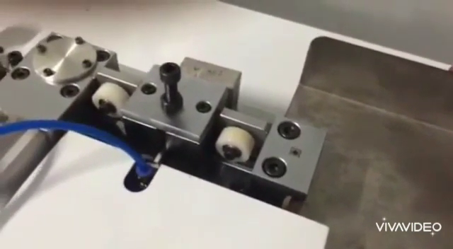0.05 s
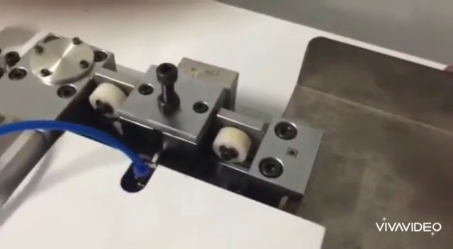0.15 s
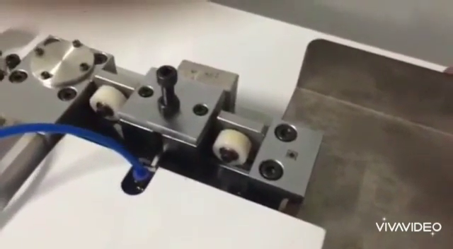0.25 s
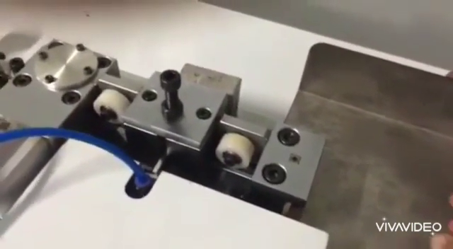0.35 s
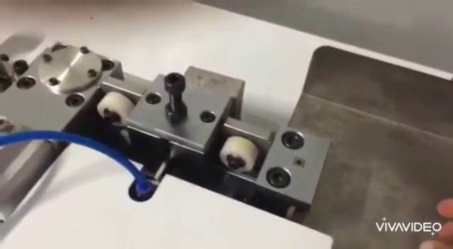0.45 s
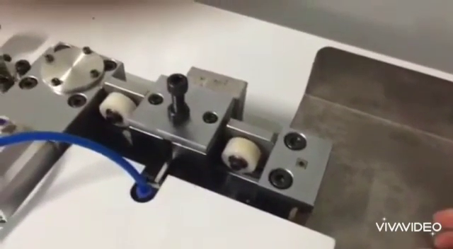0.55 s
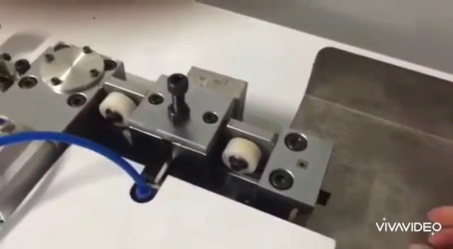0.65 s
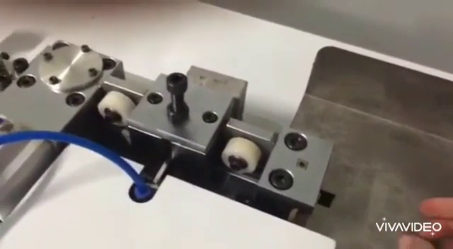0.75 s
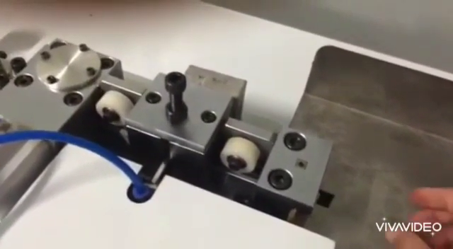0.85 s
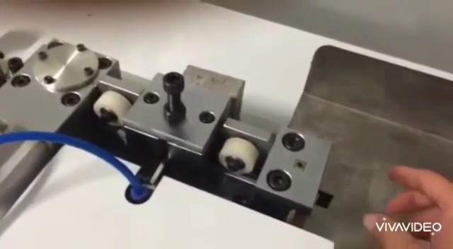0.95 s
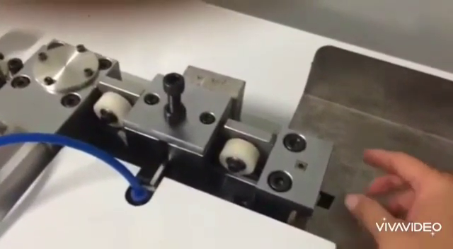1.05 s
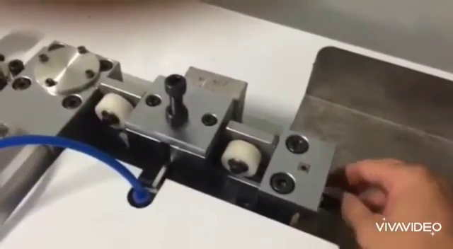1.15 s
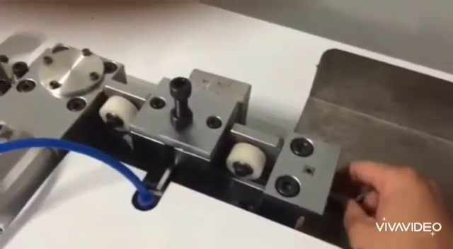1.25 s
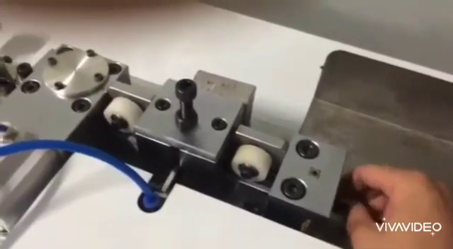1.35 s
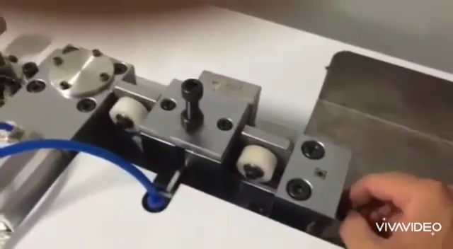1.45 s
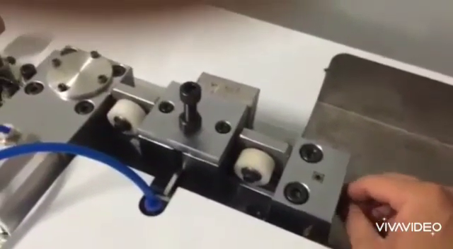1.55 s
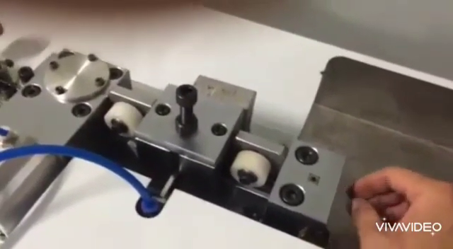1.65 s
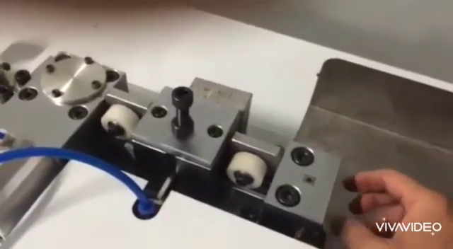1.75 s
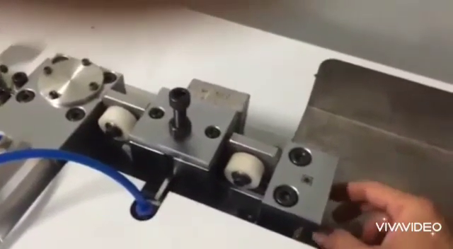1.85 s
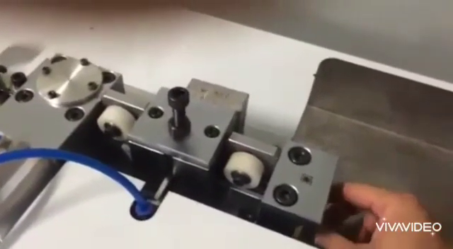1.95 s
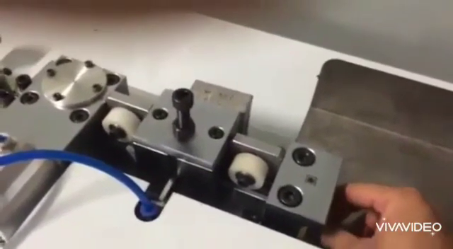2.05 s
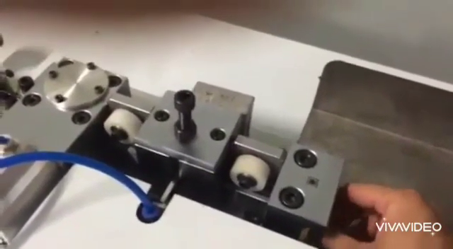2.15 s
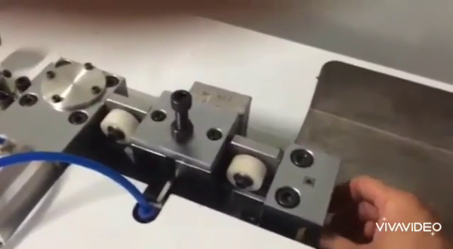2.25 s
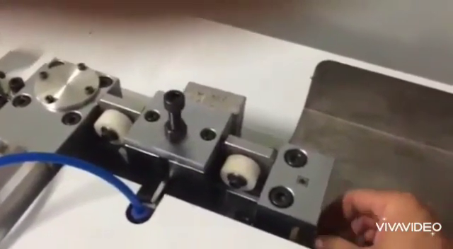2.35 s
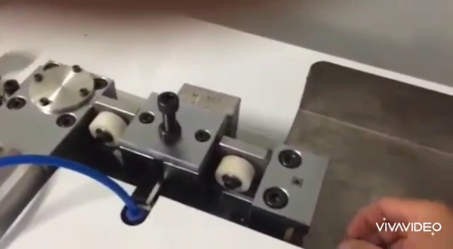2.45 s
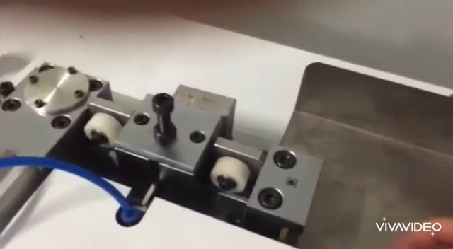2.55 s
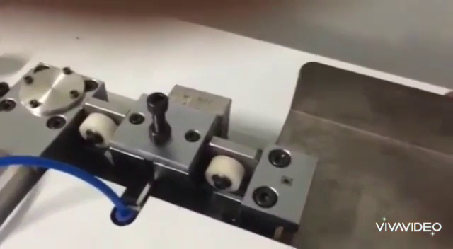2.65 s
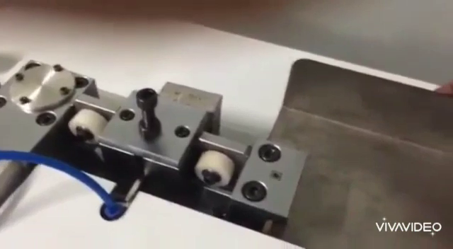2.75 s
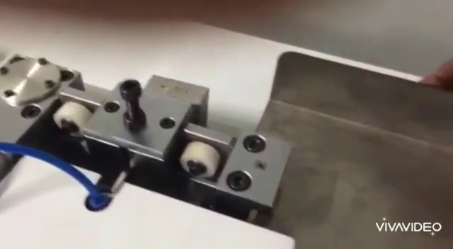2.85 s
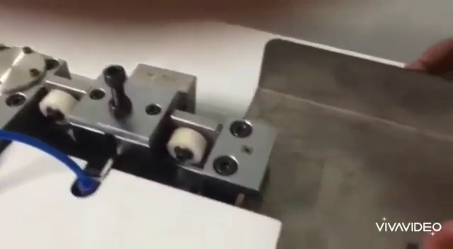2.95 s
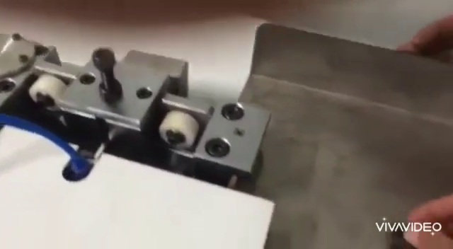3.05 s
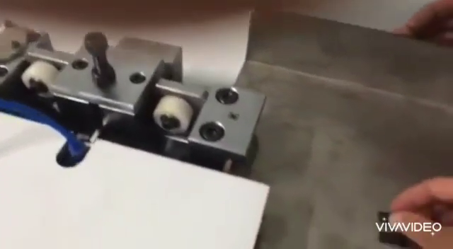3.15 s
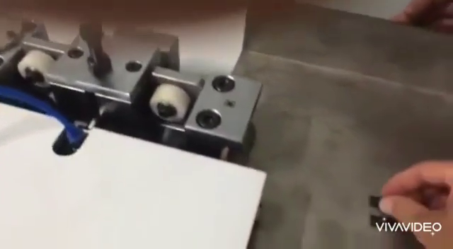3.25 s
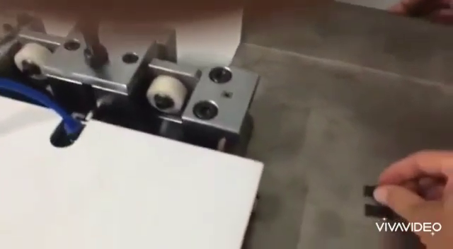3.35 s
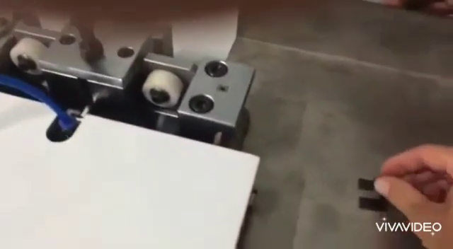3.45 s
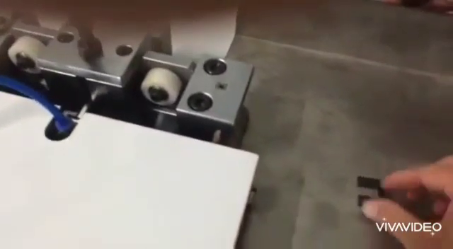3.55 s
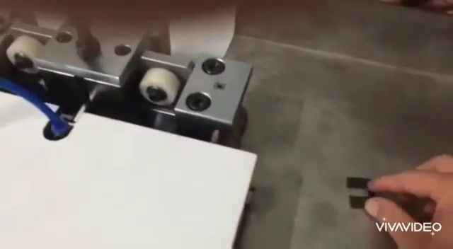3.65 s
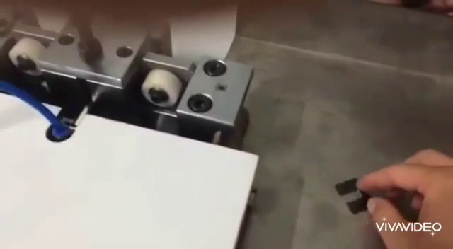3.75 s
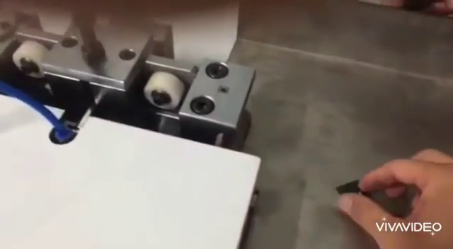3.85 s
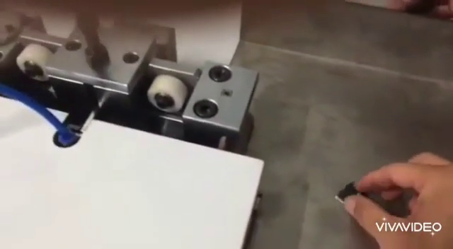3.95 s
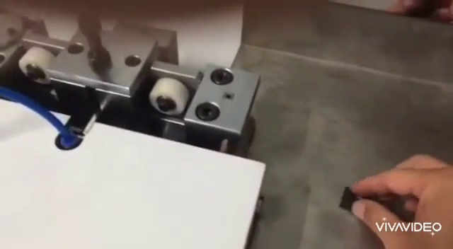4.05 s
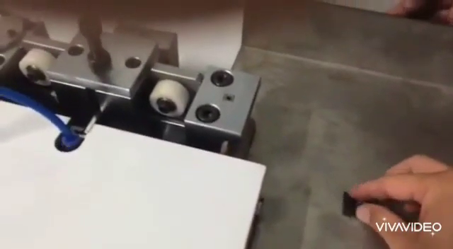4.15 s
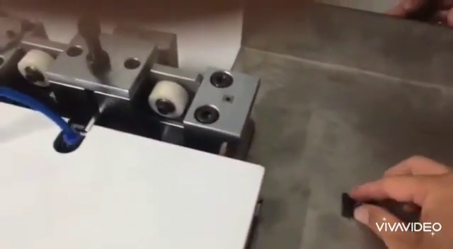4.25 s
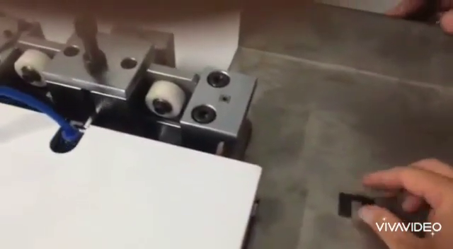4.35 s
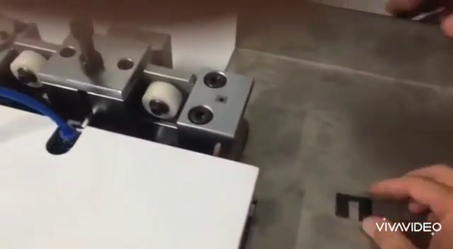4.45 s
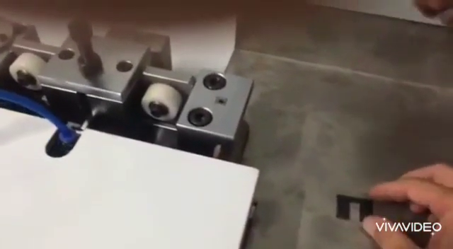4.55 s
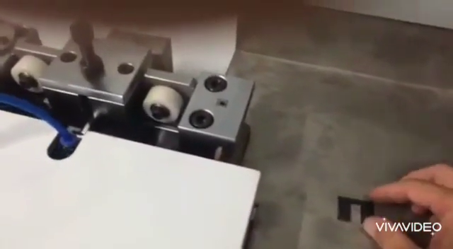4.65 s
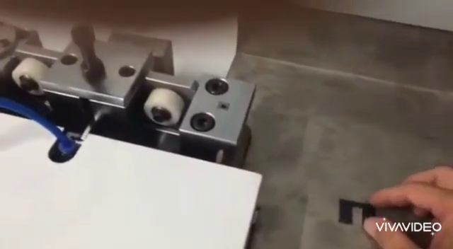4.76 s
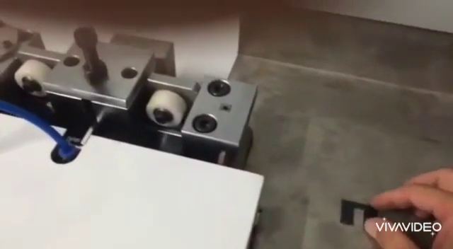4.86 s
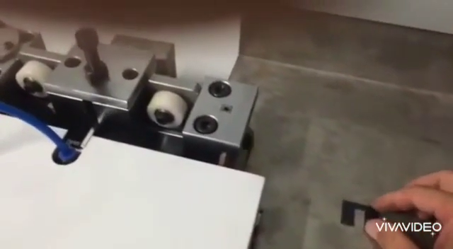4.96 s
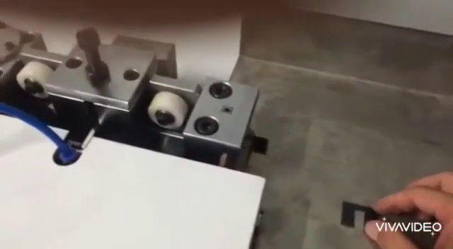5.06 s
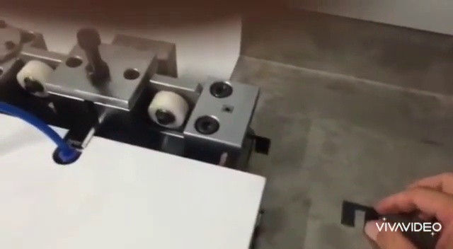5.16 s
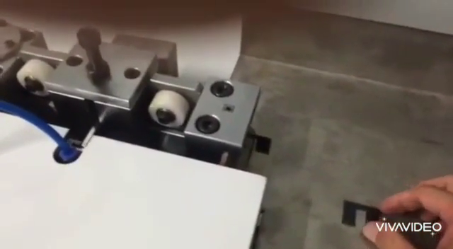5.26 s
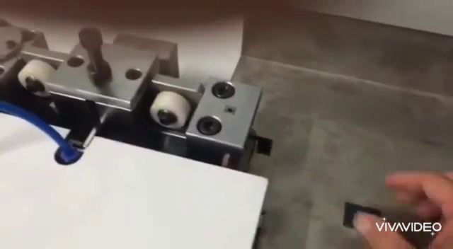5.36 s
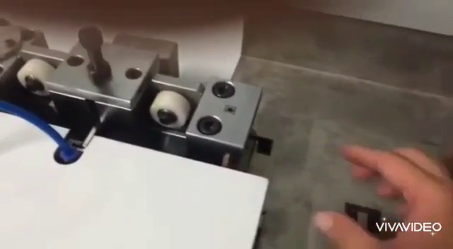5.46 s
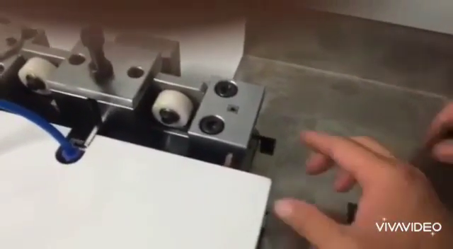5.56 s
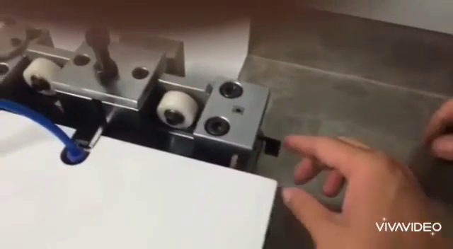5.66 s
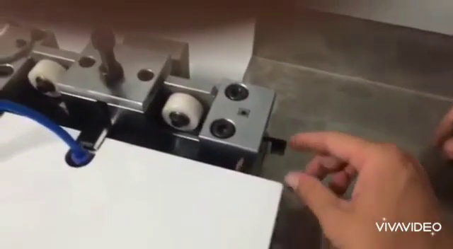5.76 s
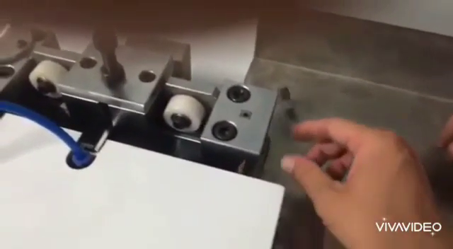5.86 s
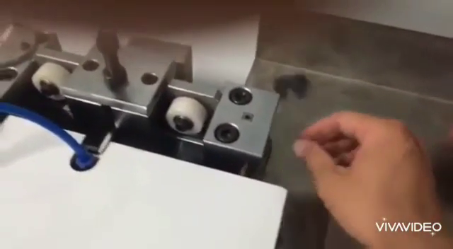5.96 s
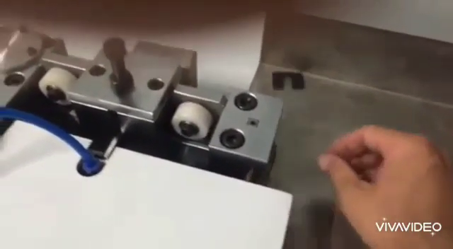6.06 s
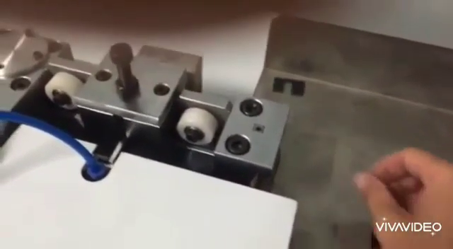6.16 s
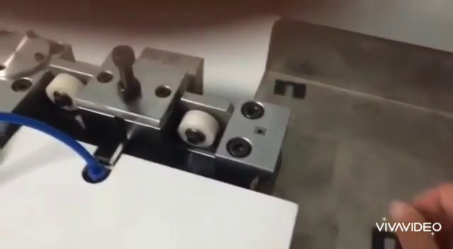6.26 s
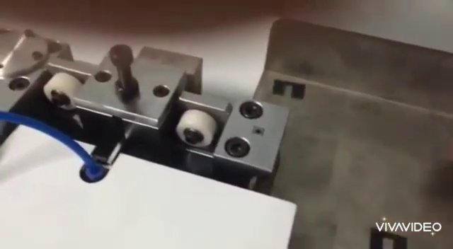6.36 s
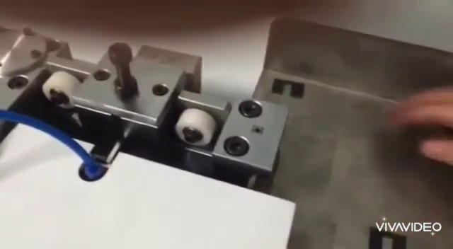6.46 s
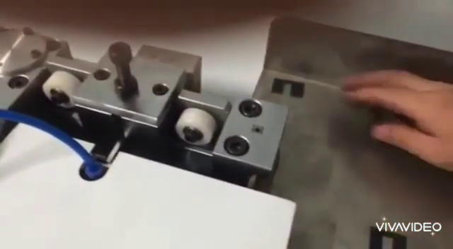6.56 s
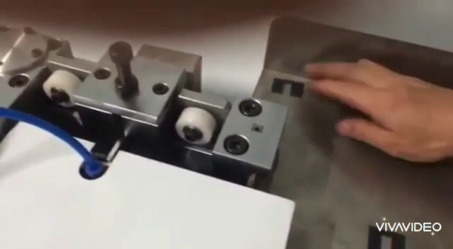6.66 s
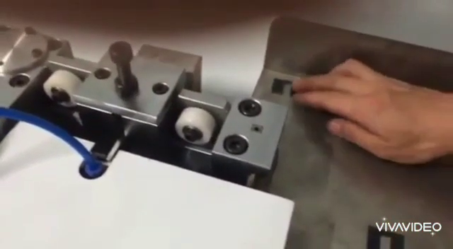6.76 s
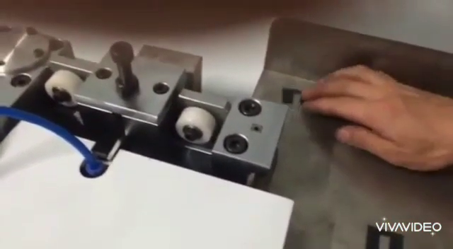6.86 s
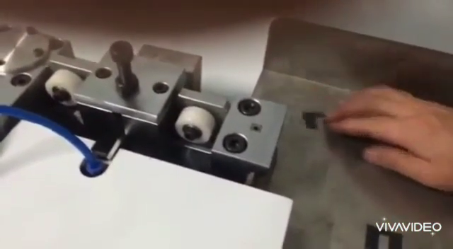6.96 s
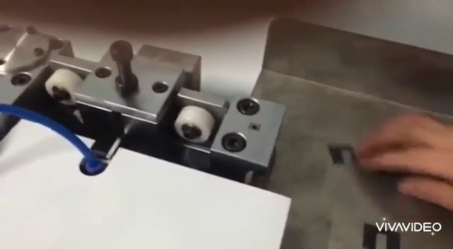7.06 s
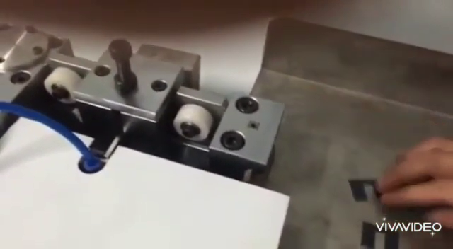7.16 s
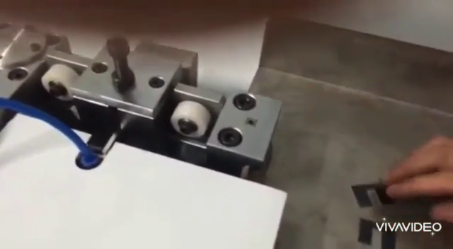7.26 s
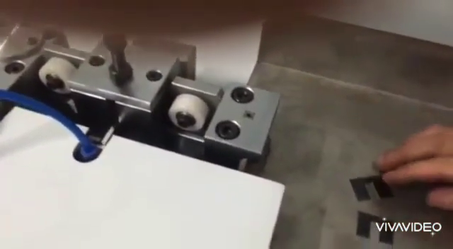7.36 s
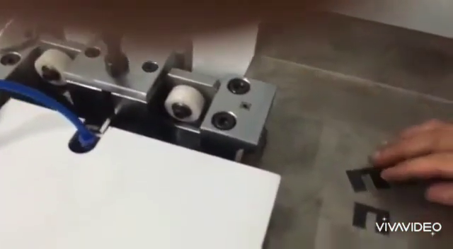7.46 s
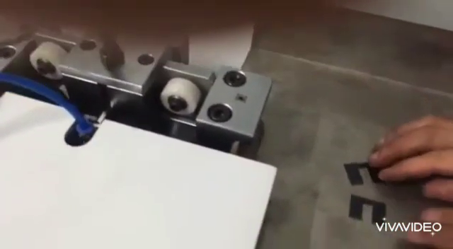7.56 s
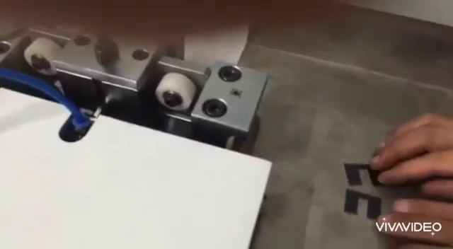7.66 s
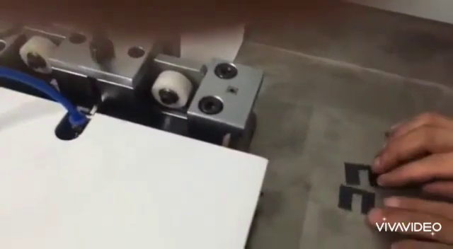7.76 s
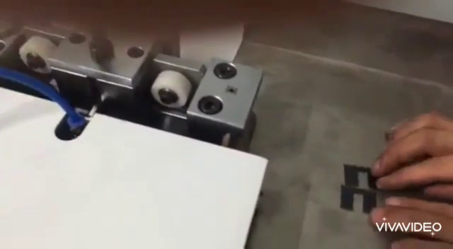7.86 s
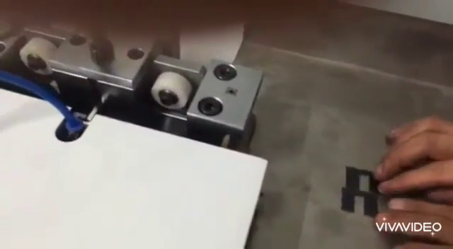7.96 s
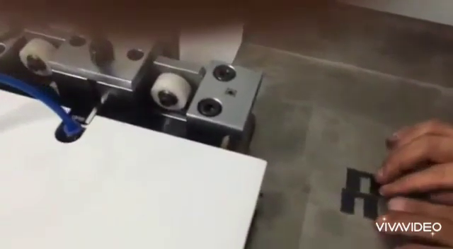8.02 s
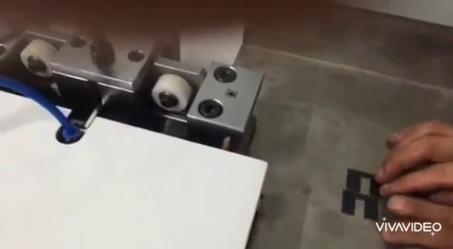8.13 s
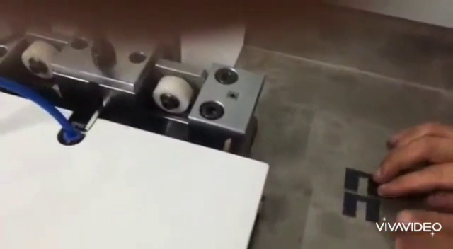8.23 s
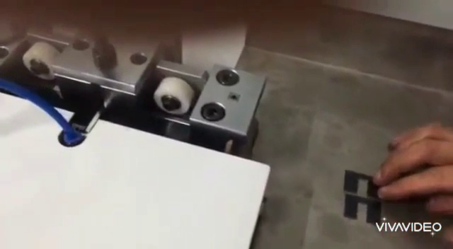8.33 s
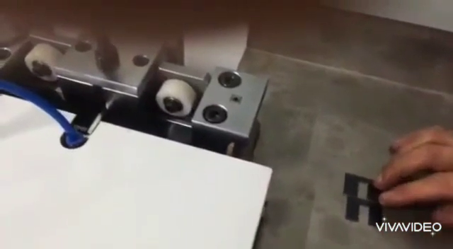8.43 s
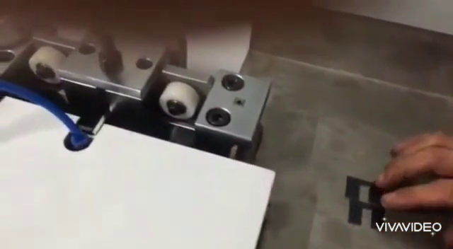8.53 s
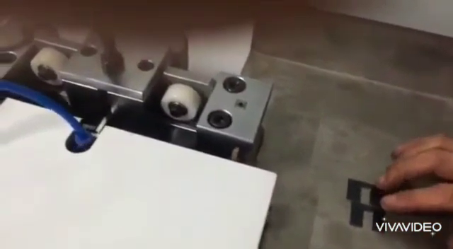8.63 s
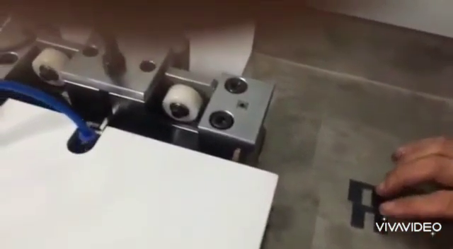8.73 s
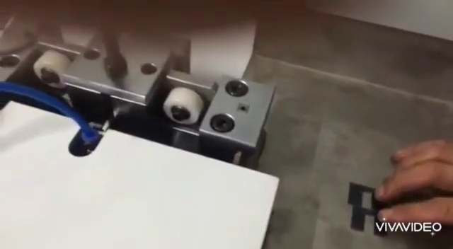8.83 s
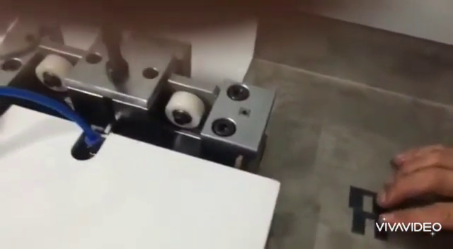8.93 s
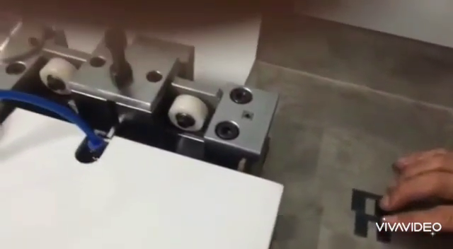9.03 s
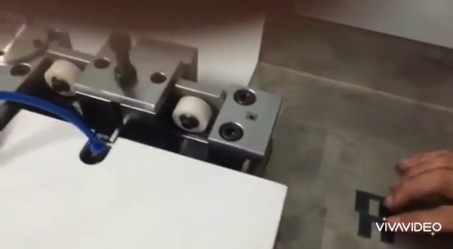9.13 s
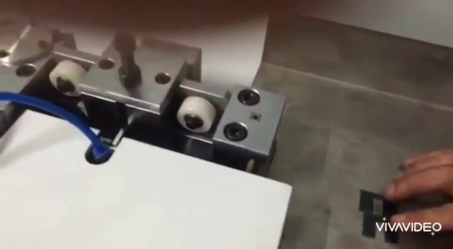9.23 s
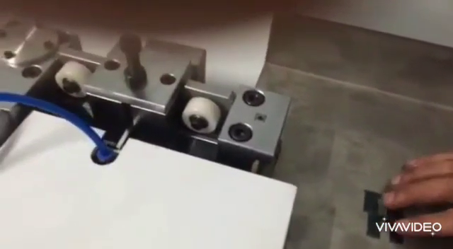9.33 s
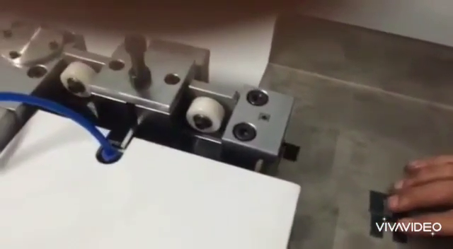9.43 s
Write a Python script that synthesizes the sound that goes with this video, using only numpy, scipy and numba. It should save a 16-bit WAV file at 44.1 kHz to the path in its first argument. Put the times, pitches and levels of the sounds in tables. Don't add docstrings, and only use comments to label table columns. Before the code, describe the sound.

A pneumatic strip-bending machine works close to a mono phone microphone, over low workshop rumble and a short room tail. At 0 s a feed clack and piston slam start a rushing hose; a sharp vent snap follows at 0.6. At 1.4 a strong eject blast slams, whistles downward and shakes the bench in a deep rough rumble, with a loud clack at 1.6 and a return blow with a second falling whistle near 2.0. Clamp air roars at 2.7, the die hits at 3.2, the strip chirps and squeals around 3.3-3.5, and shift and bend hisses run 3.8-4.3. The cycle restarts at 4.4, venting at 5.0 and blasting at 5.8; a thin steel part bounces and rings brightly from 6.0 to 6.3. A short creeping puff comes at 7.1, then clamp, harder die slam at 7.6, brief squeals at 7.7-7.9, bending air at 8.4, another feed at 8.8 and vent snap at 9.4.

```python
import sys
import numpy as np
from scipy import signal
from scipy.fft import rfft, irfft
from scipy.io import wavfile
from scipy.ndimage import uniform_filter1d
from numba import njit

SR = 44100
rng = np.random.default_rng(int(sys.argv[2]) if len(sys.argv) > 2 else 0)


def materialize(psi):
    bounded = np.clip(np.atleast_2d(psi).T, -1, 1)
    quanta = np.round(bounded * 32767).astype(np.int16)
    wavfile.write(sys.argv[1], SR, quanta)


def boost_factor(decibels):
    exponent = np.asarray(decibels, float) / 20
    return 10 ** exponent


N = 418498
T = np.arange(N) / SR
HIT_T = T[:SR // 3]
CYCLE_S = 4.387

BLASTS_S = [
    1.424,
    5.801,
]


def noise():
    return rng.standard_normal(N)


def unit(x):
    return x / np.sqrt(np.mean(x ** 2))


def curve(tables, column):
    rows = np.vstack(tables)
    return np.interp(T, rows[:, 0], rows[:, column])


def gate(spans, edge_s):
    is_open = sum(1. * ((T >= start) & (T < end)) for start, end in spans)
    return uniform_filter1d(is_open, int(edge_s * SR))


def lifespan(tables):
    return [(table[0][0], table[-1][0]) for table in tables]


def colour(x, points):
    hz, db = np.transpose(points)
    f = np.maximum(np.arange(N // 2 + 1) * SR / N, 1)
    return irfft(rfft(x) * boost_factor(np.interp(np.log(f), np.log(hz), db)), N)


def band(x, lo_hz, hi_hz):
    return signal.sosfilt(signal.butter(3, [lo_hz, hi_hz], "bandpass", fs=SR, output="sos"), x)


@njit
def svf(x, hz, width):
    y, b, l = np.empty(len(x)), 0., 0.
    for i in range(len(x)):
        g, k = np.tan(np.pi * hz[i] / SR), width / hz[i]
        v = (b + g * (x[i] - l)) / (1 + g * (g + k))
        b, l, y[i] = 2 * v - b, l + 2 * g * v, k * v
    return y


def walk(rate):
    k = int(SR / rate)
    steps = np.repeat(rng.standard_normal(N // k + 1), k)
    return 1.63 * uniform_filter1d(uniform_filter1d(steps, k), k)[:N]


def resonate(x, peaks, patchy_db=0.):
    total = np.zeros(N)
    for hz, width, db in peaks:
        total += boost_factor(db + patchy_db * walk(14)) * svf(x, np.full(N, 1. * hz), 1. * width)
    return unit(total)


def add(out, s, x):
    i = int(s * SR)
    out[i:i + len(x)] += x[:N - i]


def fade(t, t60):
    return np.exp(-np.log(1000) * t / t60)


def ring(modes):
    x = np.zeros(len(HIT_T))
    for hz, db, t60 in modes:
        level_luck, pitch_luck = rng.standard_normal(2)
        tone = np.sin(2 * np.pi * hz * (1 + .025 * pitch_luck) * HIT_T)
        x += boost_factor(db + 2.5 * level_luck) * tone * fade(HIT_T, t60)
    return x / np.max(np.abs(x))


def fired(rows):
    firings = {"feed": [(.0364, 1, -6.5), (4.419, 0, -1), (8.8066, 0.5, 1.5)], "vent": [(.6265, 2, -3.5),
               (5.0085, 0, -1.5), (9.397, 1.5, -2.5)], "eject": [(1.424, 0, 0.5), (5.801, .5, 2)],
               "back": [(1.958, 1.5, -0.5), (6.338, .5, 0)], "creep": [(7.062, 0, 0)],
               "clamp": [(2.7436, 1, 0), (7.1334, .5, 2)], "die": [(3.2254, -2.5, 0), (7.6217, .5, 3.5)],
               "shift": [(3.8226, .5, 0), (8.22, 1, 3)], "bend": [(3.9632, .5, 0.5), (8.3602, 0, 1)]}
    events = []
    for valve, delay, *rest in rows:
        events += [(s + delay, air_db, blow_db, rest) for s, air_db, blow_db in firings[valve]]
    return sorted(events)


def burst(s, rise_s, hold_s, open_db, close_db, fall_db):
    i = max(int((s - rise_s) * SR), 0)
    t = T[i:i + int((rise_s + hold_s + 70 / fall_db) * SR)]
    times = [s - rise_s, s, s + hold_s, s + hold_s + 9]
    levels_db = [open_db - 26, open_db, close_db, close_db - 9 * fall_db]
    return i / SR + 1e-6, boost_factor(np.interp(t, times, levels_db)) ** 2


def chirps(rows, rise_db, fall_db):
    share = np.array([0, .3, .8, 1])
    dip_db = np.array([rise_db, 0, fall_db / 4, fall_db])
    return [np.c_[s + share * length, start_hz + share * (end_hz - start_hz), db - dip_db]
            for s, length, start_hz, end_hz, db in rows]


def rubbing(tables, width_hz, clean, throb_db, throb_rate, over_db):
    hz = curve(tables, 1)
    tone = np.sqrt(2) * np.sin(2 * np.pi * np.cumsum(hz) / SR)
    over_hz, over_width = 1.7 * hz, 3.5 * width_hz
    overtone = unit(svf(svf(noise(), over_hz, over_width), over_hz, over_width))
    rough = unit(svf(noise(), hz, width_hz)) + boost_factor(over_db) * overtone
    level = boost_factor(curve(tables, 2) + throb_db * walk(throb_rate))
    return (clean * tone + (1 - clean) * rough) * level * gate(lifespan(tables), edge_s=0.0052)


def shop():
    # f/Hz, level/dB
    floor = [(15, -56), (25, -21), (113, -2.5), (173, -6.5), (221, -16.5), (305, -7), (368, -23),
             (1080, -27), (1170, -19.5), (12200, -38), (15500, -61)]
    return unit(colour(noise(), floor)) * boost_factor(-44.5 + 1.3 * walk(3))


def piston_hum():
    # valve, delay/s, length/s, from f/Hz, to f/Hz, level/dB
    seals = [
        ("feed", -0.0627, 0.0662, 437, 437, -20.5),
        ("die", -0.062, 0.079, 450, 450, -20),
        ("die", 0.013, 0.057, 437, 433, -20.5),
    ]
    # valve, delay/s, length/s, from f/Hz, to f/Hz, level/dB
    guard = [
        ("vent", .078, .085, 505, 500, -34),
        ("vent", .28, .07, 575, 570, -40),
    ]
    driven = [(s, length, start_hz, end_hz, db + air_db)
              for s, air_db, _, (length, start_hz, end_hz, db) in fired(seals)]
    plate = [(s, *row) for s, _, _, row in fired(guard)]
    tones = chirps(driven, rise_db=6, fall_db=-3) + chirps(plate, rise_db=-2, fall_db=21)
    tones = sorted(tones, key=lambda tone: tone[0, 0])
    return rubbing(tones, width_hz=170.0, clean=0.6, throb_db=2.5, throb_rate=70, over_db=-44)


def air_levels():
    # valve, outlet, delay/s, length/s, opening level/dB, closing level/dB
    valve_flows = [("feed", "port", -0.052, 0.037, -29, -30), ("feed", "hose", 0.012, .22, -24, -33.5),
                   ("feed", "barrel", 0.0052, 0.65, -37, -39), ("feed", "hose", 0.26, 0.268, -32, -24.5),
                   ("feed", "port", 0.526, 0.052, -32, -28.5), ("vent", "port", 0, 0.072, -24.5, -20.5),
                   ("vent", "hose", 0.26, 0.37, -33, -73), ("eject", "nozzle", 0.0035, 0.11, -17, -19),
                   ("eject", "nozzle", 0.14, 0.39, -19.5, -48), ("back", "nozzle", 0.001, 0.12, -20, -22.5),
                   ("back", "port", 0.44, 0.33, -58.5, -49),
                   ("creep", "hose", 0, .006, -24.5, -30), ("creep", "hose", 0.04, .03, -18.5, -20),
                    ("clamp", "clamp", 0.00067, 0.055, -22, -15.5),
                    ("clamp", "clamp", 0.092, 0.3, -18.5, -22), ("die", "port", -0.063, 0.0055, -30, -23.5),
                    ("die", "barrel", 0, 0.34, -41.5, -42), ("die", "hose", 0.067, 0.27, -27.5, -50),
                    ("shift", "clamp", -0.338, 0.193, -36, -32.5),
                    ("shift", "hose", -.155, 0.057, -33.5, -23),
                    ("shift", "clamp", -.092, 0.081, -23.5, -23.5), ("shift", "port", 0, 0.068, -22, -18),
                    ("bend", "clamp", 0.0036, 0.224, -21.5, -19), ("bend", "port", 0.23, 0.14, -20, -22.5)]
    outlets = {"port": (1.44, -4), "hose": (-3.5, -1.5), "barrel": (1, 10.56), "nozzle": (-0.24, -0.75),
               "clamp": (-0.64, -1.06)}
    linger_db = [-20.5, -10.5, -9.5]
    linger_t60_s = [1, 0.97, 0.98]
    power = np.full((3, N), 1e-9)
    flows = [(valve, *row, outlet) for valve, outlet, *row in valve_flows]
    for s, air_db, _, (length, open_db, close_db, outlet) in fired(flows):
        start, flow = burst(s, .014, length, open_db + air_db, close_db + air_db, fall_db=303)
        hiss_db, roar_db = outlets[outlet]
        for path, db in zip(power, (hiss_db, 0, roar_db)):
            add(path, start, flow * boost_factor(db) ** 2)
    levels = []
    for direct, db, t60 in zip(power, linger_db, linger_t60_s):
        k = np.exp(-2 * np.log(1000) / (t60 * SR))
        lingering = signal.lfilter([1 - k], [1, -k], direct)
        levels.append(10 * np.log10(direct + boost_factor(db) ** 2 * lingering))
    return levels


def air_jets(hiss_db, rush_db, roar_db):
    # f/Hz, level/dB
    spectrum = [(590, -55), (1000, 8), (1190, -5), (1360, 7.5), (2390, 7), (3150, -1.5), (9690, -3),
                (14300, -8.5), (15500, -8.5)]
    jet = colour(noise(), spectrum)
    flutter_db = walk(25)
    hiss = unit(band(jet, 7430, 15000)) * boost_factor(hiss_db + flutter_db)
    rush = unit(band(jet, 2984, 8240)) * boost_factor(rush_db + flutter_db)
    roar = unit(band(jet, 987, 3830)) * boost_factor(roar_db - 4.0 + 1.6 * walk(30))
    return hiss + rush + roar


def strokes(start, end):
    return gate([(start + k * CYCLE_S, end + k * CYCLE_S) for k in range(3)], edge_s=0.014)


def hoses(roar_db):
    # f/Hz, width/Hz, level/dB
    feed = [(1675, 63, 4.5), (1970, 51, 10.5), (2350, 140, -1), (2720, 36, 1.5), (4400, 90, -9)]
    # t/s, f/Hz
    barrel_pitch = [
        (.06, 2400),
        (.3, 3220),
        (.62, 2910),
    ]
    # f/Hz, width/Hz, level/dB
    eject = [(2400, 30, 0)]
    # f/Hz, width/Hz, level/dB
    clamp = [(1326, 230, 2), (3030, 360, 1.5), (3820, 48, -1), (4460, 42, 8)]
    # f/Hz, width/Hz, level/dB
    shift = [(1700, 65, -13), (1900, 220, 5), (2320, 70, -1)]
    # f/Hz, width/Hz, level/dB
    bend = [(1310, 190, -3.5), (3193, 130, 1), (3680, 190, 3), (4170, 100, 4)]
    barrel = unit(svf(noise(), np.interp(T % CYCLE_S, *np.transpose(barrel_pitch)), 330.0))
    feeding = resonate(noise(), feed, patchy_db=3.5) + boost_factor(-2.5) * barrel
    out = strokes(0.054, .62) * feeding * boost_factor(roar_db - 4)
    out += gate([(5.83, 5.915)], edge_s=.02) * resonate(noise(), eject) * boost_factor(roar_db - 6)
    out += strokes(2.75, 3.14) * resonate(noise(), clamp, patchy_db=2.5) * boost_factor(roar_db - 5)
    out += strokes(3.73, 3.82) * resonate(noise(), shift, patchy_db=2.5) * boost_factor(roar_db - 1)
    out += strokes(3.98, 4.34) * resonate(noise(), bend, patchy_db=2.5) * boost_factor(roar_db - 3)
    return out


def frame(roar_db):
    # f/Hz, width/Hz, level/dB
    boom_modes = [(85, 19, -1.5), (123, 7.7, -8), (208.5, 30, -5), (252, 19, -5.5)]
    # f/Hz, width/Hz, level/dB
    panel_modes = [(463, 37, -7), (534, 18, 1), (674, 95, -0.5), (870, 100, -3)]
    # valve, delay/s, swell/s, boom level/dB, panel level/dB, fading/(dB/s)
    shakes = [
        ("feed", 0.0078, .02, -31, -47, 45),
        ("eject", 0.0071, 0.018, -42, -25, 150),
        ("eject", .18, 0.16, -17, -22, 51.5),
        ("back", 0.0099, 0.022, -25, -25, 87),
        ("clamp", .01, .02, -31.5, -24.5, 180),
        ("creep", 0, 0.057, -35, -48, 82),
        ("die", 0.048, .3, -31, -35, 34),
        ("die", 0.022, .02, -23.5, -35, 130),
        ("clamp", -.085, .015, -32, -46, 110),
    ]
    boom = resonate(noise(), boom_modes, patchy_db=2.0) + 0.23 * unit(band(noise(), 43.5, 440))
    rattle = noise() * boost_factor(3.05 * walk(60))
    panel = resonate(rattle, panel_modes, patchy_db=1.0) + 0.52 * unit(band(noise(), 352, 984))
    boom_power = np.full(N, boost_factor(-49.5) ** 2)
    panel_power = boost_factor(-55.5) ** 2 + boost_factor(roar_db - 16.5) ** 2
    for s, air_db, _, (swell, boom_db, panel_db, fall_db) in fired(shakes):
        start, shake = burst(s, swell, .001, air_db, air_db, fall_db)
        add(boom_power, start, shake * boost_factor(boom_db) ** 2)
        add(panel_power, start, shake * boost_factor(panel_db) ** 2)
    lumps_db = 1.5 * walk(35)
    return (unit(boom) * np.sqrt(boom_power) + unit(panel) * np.sqrt(panel_power)) * boost_factor(lumps_db)


def slams():
    # valve, delay/s, peak level/dB, thump level/dB
    stops = [("feed", 0.00089, -5, -35), ("vent", -.002, -14.5, -19), ("vent", 0.069, -20, -22),
             ("eject", -0.0035, -11.5, -11), ("eject", .099, -9.5, -20), ("eject", .154, -2.5, -17),
             ("back", 0.00187, -9.5, -32), ("clamp", -0.00314, -7, -16), ("die", -.08, -22, -41),
             ("die", 0.00308, -6.5, -37), ("shift", -0.0019, -22, -27), ("shift", .075, -21, -17.5),
             ("bend", -0.00196, -8, -25), ("bend", .382, -25, -37)]
    # t/s, peak level/dB, thump level/dB
    knocks = [
        (2.658, -37, -28),
        (6.261, -20, -5),
        (7.023, -24, -51),
    ]
    # f/Hz, level/dB, t60/s
    block = [(220.4, 2, 0.07), (282, 2.5, 0.11), (476, 8, 0.042), (568, -1.5, 0.09), (689, 11.5, 0.048),
             (918, 6.5, 0.055)]
    thump = np.sin(2 * np.pi * 95 * HIT_T) * fade(HIT_T, 0.043)
    thump += .6 * np.sin(2 * np.pi * 170 * HIT_T) * fade(HIT_T, 0.0084)
    blows = [(s, db + blow_db, thump_db) for s, _, blow_db, (db, thump_db) in fired(stops)]
    out = np.zeros(N)
    for s, db, thump_db in blows + knocks:
        add(out, s, boost_factor(db) * ring(block) + boost_factor(thump_db) * thump)
    return out


def puffs(events, rise_s, t60):
    # f/Hz, level/dB, t60/s
    die = [(258, -11, .45), (205, -12, .2), (340, -12, .2), (1020, 0, .03), (1320, 0, .025),
           (1600, -1, .022), (1850, -1, .02), (2250, -1, .02), (2650, -2, .018)]
    out = np.zeros(N)
    shape = (fade(HIT_T, t60) + 0.21 * fade(HIT_T, 0.13)) * np.minimum(HIT_T / rise_s, 1)
    for s, db, hz, clack_db in events:
        grain = rng.standard_normal(len(HIT_T))
        focus = unit(svf(grain, np.full(len(HIT_T), 1. * hz), 1800.0))
        puff = unit(band(grain, 2300, 14200)) + 1.14 * focus
        add(out, s, boost_factor(db - 9.5) * puff * shape)
        add(out, s, boost_factor(clack_db) * ring(die))
    return out


def valve_snaps():
    # valve, delay/s, peak level/dB, centre f/Hz, clack level/dB
    spools = [
        ("feed", 0, -8.5, 7900, -1),
        ("vent", 0, -1, 7900, -29.5),
        ("clamp", 0, -16, 8700, -15),
        ("die", 0, -15.5, 8300, -0.85),
        ("shift", 0, -6.5, 8700, -28),
        ("bend", 0, -28, 11000, -13.5),
    ]
    # t/s, peak level/dB, centre f/Hz, clack level/dB
    ticks = [
        (1.3262, -29, 6800, -52),
        (1.5738, -8.5, 5700, -10),
        (2.518, -32, 3100, -23),
        (3.3367, -31, 3100, -18),
        (7.0353, -21.5, 3570, -47),
        (7.0966, -12, 5700, -22),
        (7.73, -24, 5430, -15),
    ]
    snaps = [(s, db + blow_db, hz, clack_db) for s, _, blow_db, (db, hz, clack_db) in fired(spools)]
    return puffs(snaps + ticks, rise_s=0.00081, t60=0.03)


def air_spits():
    # t/s, peak level/dB, centre f/Hz, clack level/dB
    spits = [
        (0.8887, -13.5, 4130, -23),
        (2.6633, -23.5, 6060, -25),
        (3.1731, -7.5, 5750, -30),
        (5.2726, -11, 5950, -21),
        (7.5714, -8, 5730, -13),
    ]
    return puffs(spits, rise_s=0.0042, t60=0.038)


def eject_whistle(rush_db):
    # t/s, f/Hz, level over the rush/dB
    glides = [
        [(0, 7900, 4), (.045, 7200, 5), (.1, 6350, 1), (.19, 5300, -3)],
        [(.532, 7350, 5), (.6, 6350, 2), (.67, 5750, 0), (.73, 5900, -8), (.8, 6150, -7), (1.22, 6300, -5)],
    ]
    whistle = [np.add(glide, [s, 0, 0]) for s in BLASTS_S for glide in glides]
    level_db = rush_db + curve(whistle, 2) - 1.5 + 3.3 * walk(60)
    tone = unit(svf(noise(), curve(whistle, 1), 600.))
    return tone * boost_factor(level_db) * gate(lifespan(whistle), edge_s=0.0095)


def bench_rock():
    # t/s, f/Hz, level/dB
    rock = [
        (.1, 86, -35),
        (.22, 85, -17.5),
        (.36, 84, -15),
        (.55, 85, -36),
        (.8, 83.9, -36.5),
        (1.2, 82, -48),
    ]
    tables = [np.add(rock, [s, 0, 0]) for s in BLASTS_S]
    return rubbing(tables, width_hz=28.0, clean=0.33, throb_db=1.5, throb_rate=25, over_db=-14.0)


def strip_squeal():
    # t/s, length/s, from f/Hz, to f/Hz, level/dB
    squeals = [
        (3.337, .027, 1540, 1553, -13.5),
        (3.366, 0.023, 1900, 1947, -20.5),
        (3.398, 0.07, 1780, 1430, -16),
        (3.466, .026, 1404, 1320, -15),
        (7.727, 0.015, 1747, 1700, -24),
        (7.792, 0.038, 1680, 1504, -16),
        (7.83, 0.047, 1380, 1285, -21.5),
    ]
    tones = chirps(squeals, rise_db=3.5, fall_db=5)
    first = rubbing(tones[:4], width_hz=260., clean=.55, throb_db=2.0, throb_rate=120, over_db=-7)
    second = rubbing(tones[4:], width_hz=300., clean=.6, throb_db=2.5, throb_rate=120, over_db=-14)
    return first + second


def thrown_part():
    # t/s, tick peak/dB, bending ring/dB, twisting ring/dB
    bounces = [
        (6.0345, -12, -23, -38),
        (6.1, -7, -19, -22),
        (6.1278, -8, -20, -19),
        (6.1777, -13, -18, -24),
        (6.2197, -7, -21, -25),
        (6.2674, -6, -40, -28),
    ]
    # f/Hz, level/dB, t60/s
    steel = [
        [(6982, 0, .9), (8468, -3, .22)],
        [(7913, -5, .5), (11305, -1, .3)],
    ]
    out = np.zeros(N)
    ends = [row[0] for row in bounces[1:]] + [6.32]
    for (s, db, *ring_db), end in zip(bounces, ends):
        ringing = np.zeros(len(HIT_T))
        for motion_db, modes in zip(ring_db, steel):
            for hz, mode_db, t60 in modes:
                ringing += boost_factor(motion_db + mode_db) * np.sin(2 * np.pi * hz * HIT_T) * fade(HIT_T, t60)
        damping = fade(np.maximum(HIT_T - (end - s), 0), 0.024)
        add(out, s, ringing * damping)
        add(out, s, boost_factor(db - 9.5) * rng.standard_normal(len(HIT_T)) * fade(HIT_T, 0.035))
    wobble_db = 4.5 * walk(35)
    return out * boost_factor(wobble_db)


def room(x):
    tail = rng.standard_normal(SR) * fade(T[:SR], .5) * (T[:SR] > .006)
    return boost_factor(-11) * signal.fftconvolve(x, tail / np.sqrt(np.sum(tail ** 2)))[:N]


def scene():
    hits = piston_hum() + slams() + valve_snaps() + air_spits()
    hits += bench_rock() + strip_squeal() + thrown_part()
    hiss_db, rush_db, roar_db = air_levels()
    air = air_jets(hiss_db, rush_db, roar_db) + hoses(roar_db) + eject_whistle(rush_db)
    mono = hits + room(hits) + air + frame(roar_db) + shop()
    return np.array([mono, mono])


def top_cut(x):
    return signal.sosfilt(signal.butter(12, 15990, fs=SR, output="sos"), x)


def record(dry):
    thin = signal.sosfilt(signal.butter(2, 55, "highpass", fs=SR, output="sos"), dry)
    soft = np.tanh(0.68 * thin) / 0.71
    top = signal.sosfilt(signal.ellip(8, .2, 60, 15050, fs=SR, output="sos"), soft)
    return top_cut(np.clip(top, -1, 1))


dry = scene()
out = record(dry)
materialize(out)
```